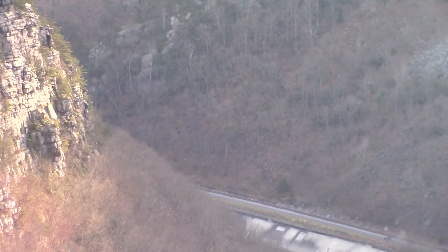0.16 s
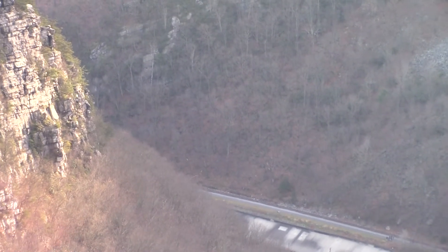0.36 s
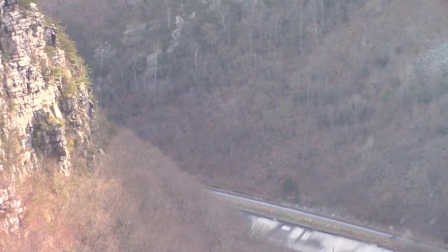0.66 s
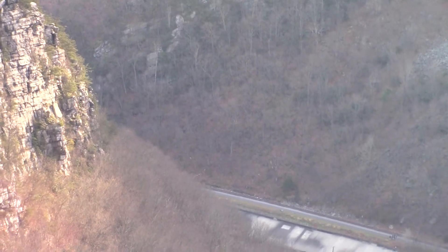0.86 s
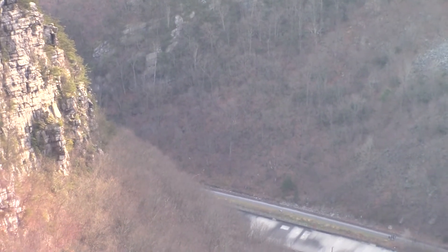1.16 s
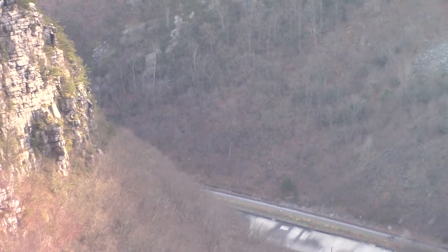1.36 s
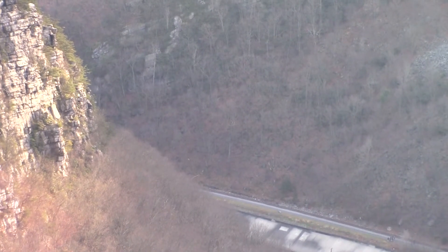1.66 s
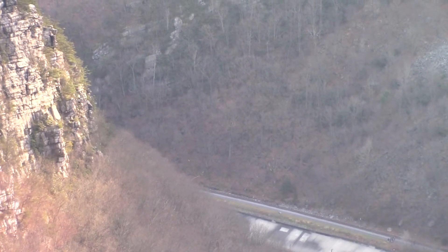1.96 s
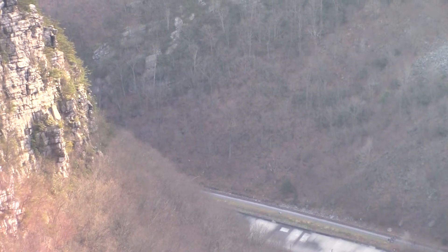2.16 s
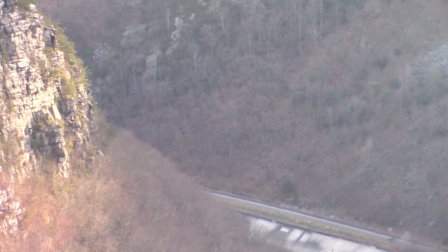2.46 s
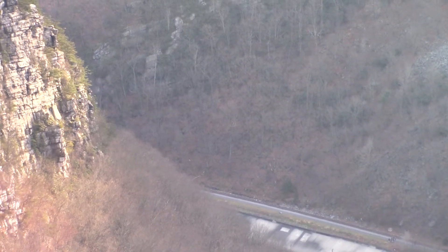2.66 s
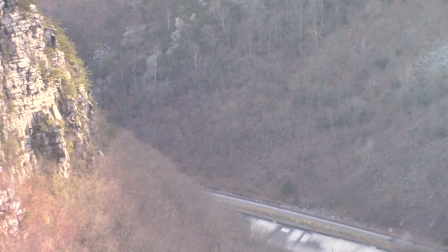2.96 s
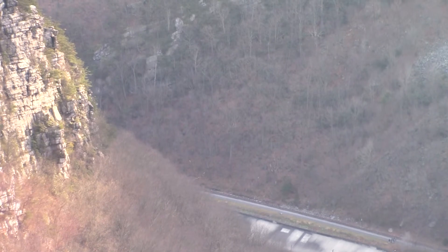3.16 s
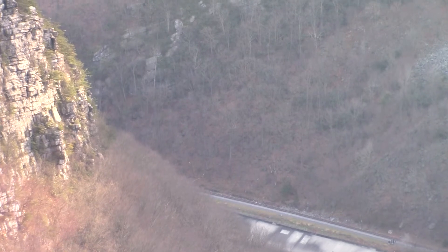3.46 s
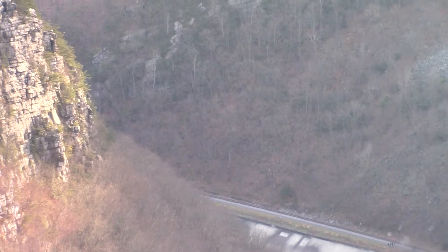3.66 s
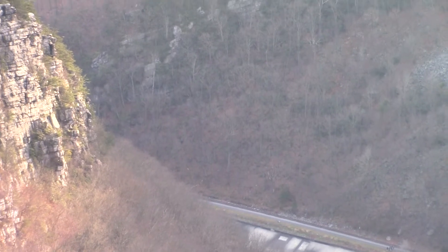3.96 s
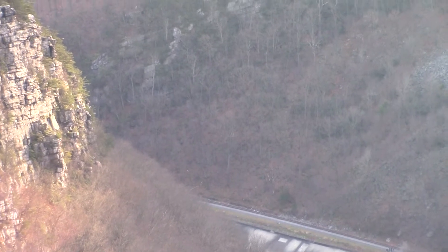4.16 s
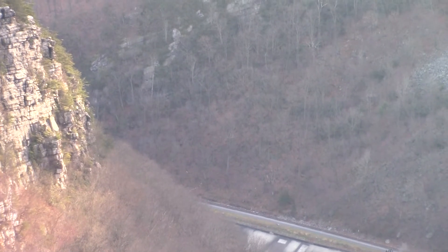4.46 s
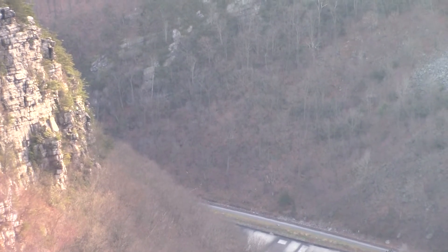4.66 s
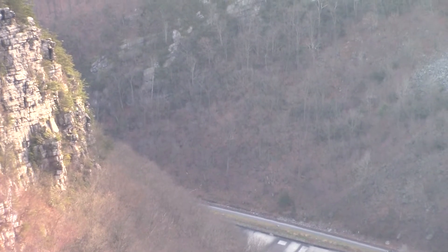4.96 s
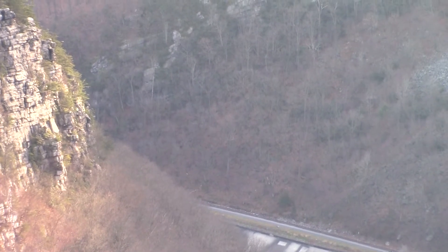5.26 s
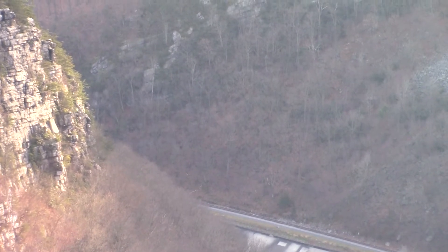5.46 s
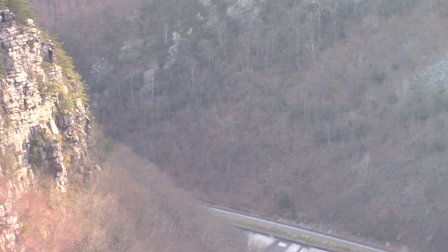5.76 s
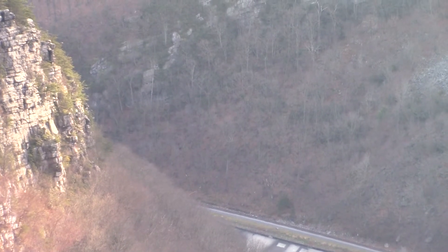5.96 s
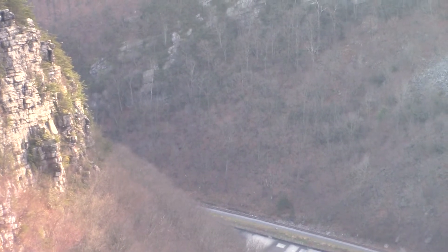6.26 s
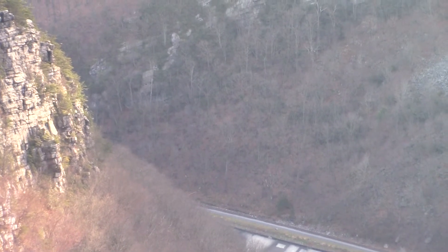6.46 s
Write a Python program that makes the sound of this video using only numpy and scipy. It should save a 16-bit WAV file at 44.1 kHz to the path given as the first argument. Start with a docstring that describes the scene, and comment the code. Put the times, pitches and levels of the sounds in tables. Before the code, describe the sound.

A distant steam locomotive whistles in a wooded valley, over an even, soft rush of river and trees. It opens with a faint breath of steam and a weak first tone. At about 0.6 seconds the whistle opens fully into one long, medium-low note that climbs slightly in pitch and swells until about 2 seconds. Long echoes from the slopes beat against it, making it waver. Low wind thumps hit the microphone between 1.8 and 2.6 seconds, and more weakly from 4 to 4.6. From around 3 seconds the whistle sags and closes, ending near 4 while its echo rings on. At about 4.9 seconds a second, slightly brighter blast begins, rising again with a breathy rush of steam, and holds to the end at around 6.7 seconds. The sound is nearly mono, with very faint hiss and a barely audible thin high whine.

```python
"""A distant steam whistle in a wooded valley: one long blast, eased off, then pulled open again.
A steam jet sounds the locomotive's bell; the note climbs with the pressure, and the slopes return
long echoes that beat against it. Behind it is the even rush of river and trees. Gusts thump a
nearly mono microphone, over faint hiss and a thin electronic whine."""
import sys
import numpy as np
from scipy import signal
from scipy.fft import rfft, irfft, next_fast_len
from scipy.io import wavfile
from scipy.ndimage import uniform_filter1d

SR = 44100
rng = np.random.default_rng(int(sys.argv[2]) if len(sys.argv) > 2 else 0)


def persist_wave(psi):
    """Save psi, clipped to +-1, as 16-bit WAV."""
    counts = np.round(np.clip(psi, -1, 1) * 32767).astype(np.int16)
    wavfile.write(sys.argv[1], SR, np.atleast_2d(counts).T)


N = 291940
TIME = np.arange(N) / SR

# whistle cord pulls: t_open/s, t_ease/s, f_first/Hz, f_full/Hz, blow/dB
CORD_PULLS = [(.16, .5, 296, 302.6, -21), (.59, 2.65, 313.8, 343.6, 0.5), (4.89, 7, 322.8, 343.4, 0.47)]


def locomotive(cliff_db=-9, scatter_db=-7, steam_db=-2.5):
    """Whistle and steam heard across the valley; moving air makes each partial fade and shimmer."""
    # fading of the fundamental: t/s, relative level/dB
    fading = [(0.0, -31), (0.07, -45), (0.28, -34.5), (0.59, -31), (0.66, -21.5), (0.77, -29.5),
              (1.2, -13.5), (1.51, -21.5), (1.97, -16.5), (2.16, -23), (2.36, -13), (2.45, -29),
              (2.54, -15), (2.67, -14), (2.84, -36), (2.93, -17), (3.26, -22.5), (3.32, -17), (3.91, -20),
              (3.95, -26), (4.02, -16), (4.57, -27.5), (5.6, -17.5), (5.66, -24.5), (5.79, -14),
              (6.36, -26), (6.47, -17), (6.62, -17)]
    note, overtones = whistle()
    reflections = slopes()
    cliff = from_db(cliff_db) * echo(note, delay_s=0.88, closing_m_s=3.2)   # bare rock: clean return
    note = note + cliff + from_db(scatter_db) * scatter(note, reflections)
    note_db = np.interp(TIME, *np.transpose(fading)) + 0.52 + 1.15 * drift(11)
    out = impose_level(note, note_db, window=3000)
    for overtone, level_db in overtones:
        shimmer_db = 1.6 * drift(9.4)
        out += impose_level(valley_paths(overtone, reflections), level_db + shimmer_db, window=9000)
    return out + valley_paths(from_db(steam_db) * steam(), reflections)


def whistle(flutter=0.003803, wander=0.001594, edge_db=-9.5):
    """Steam-blown bell: the fundamental, and (wave, level/dB with late echo) for each overtone."""
    # overtones: harmonic, level/dB at 0 dB blow, growth/(dB/dB), second blast/dB, echo/dB, roughness/dB
    harmonics = [(2, -33, 2.1, -3, -6, 2.5), (3, -30.5, 2.5, 1, -1.15, 2.5), (4, -39.5, 2.5, 4, -8, 2.5),
                 (5, -40, 1, 1.5, -11, 5), (6, -45.5, 1.4, 1.5, -14.5, 5.5), (7, -58, -0.3, 2, -13, 4.5),
                 (8, -65.5, -0.3, 3, -10.5, 5.5), (9, -71.5, 0.2, 2, -11.5, 6.5)]
    pitch_hz, blow_db = valve()
    second_blast = ramp(CORD_PULLS[-1][0], 0.037)
    detune = 1 + flutter * drift(28) + wander * drift(3)   # jet turbulence, pressure drift
    phase = 2 * np.pi * np.cumsum(pitch_hz * detune) / SR
    weak_blow = np.minimum(from_db(blow_db - edge_db), 1)   # overtones drop away below edge_db
    overtones = []
    for k, db, growth, change_db, echo_db, rough_db in harmonics:
        strength = from_db(db + growth * blow_db + change_db * second_blast) * weak_blow
        wave = strength * from_db(rough_db * drift(33)) * np.sin(round(k) * phase)
        overtones.append((wave, linger(strength, echo_db)))
    return from_db(blow_db) * np.sin(phase), overtones


def valve(idle_hz=289.4, idle_db=-44.5, sag_db_per_hz=0.11):
    """Pitch/Hz and blow/dB: each pull scoops up, creeps to full pitch, sinks as the valve closes."""
    scoop_s, creep_s, close_s = 0.15, 1.5, 1.3
    attack_s, release_s = 0.037, 0.48
    pitch_hz, blow = np.full(N, idle_hz), np.full(N, from_db(idle_db))
    for open_s, ease_s, first_hz, full_hz, db in CORD_PULLS:
        scoop_hz = (first_hz - idle_hz) * ramp(open_s, scoop_s)
        creep_hz = (full_hz - first_hz) * np.sin(np.pi / 2 * ramp(open_s + scoop_s, creep_s))
        lift_hz = scoop_hz + creep_hz
        closing = 1 - ramp(ease_s, close_s) ** 2.7
        pitch_hz = np.maximum(pitch_hz, idle_hz + lift_hz * closing)
        gate = ramp(open_s, attack_s) * (1 - ramp(ease_s + close_s - release_s, release_s)) ** 2
        sag_db = sag_db_per_hz * (idle_hz + lift_hz - full_hz)   # weak until the note has climbed
        blow = np.maximum(blow, gate * from_db(db + sag_db))
    return pitch_hz, 20 * np.log10(blow)


def steam():
    """Unpitched steam: a broad rush, and noise ringing in the bell's second resonance."""
    # broad rush: f/Hz, relative density/dB
    rush_spectrum = [(300, -34.5), (550, -1.5), (720, 4.5), (900, 3), (1100, 1.5), (1400, -12), (2000, -29),
                     (3000, -44), (5000, -77.5)]
    # hollow bell resonance: f/Hz, relative density/dB
    hollow_spectrum = [(700, -49.5), (840, -27.5), (890, -6), (945, -0.5), (1000, -2.5), (1200, -58.5)]
    # spurts across the lip: t/s, rush/dB, hollow/dB, half length/s
    spurts = [(0, -31.5, -53.5, 0.83), (3.722, -62.5, -33, .18), (4.974, -51, -25.5, .06),
              (5.551, -37.5, -32, 0.71)]
    rush, hollow = from_db(-48), from_db(-44.5)   # steady flow
    for centre_s, rush_db, hollow_db, half_s in spurts:
        shape = swell(centre_s, half_s)
        rush = np.hypot(rush, from_db(rush_db) * shape)
        hollow = np.hypot(hollow, from_db(hollow_db) * shape)
    return rush * unit_rms(noise(rush_spectrum)) + hollow * unit_rms(noise(hollow_spectrum))


def valley_paths(x, reflections, direct_db=-2):
    """Direct path plus scattered sound."""
    return from_db(direct_db) * x + scatter(x, reflections)


def slopes():
    """Dense tree reflections, duller with distance: (delay, closing speed, response) per slope."""
    # wooded slopes: delay/s, t60/s, level/dB, closing speed/(m/s), f_cut/Hz
    hillsides = [(.01, 1.3, 2, 0, 3570), (1.05, 1.7, -2, 3, 1160), (1.4, 6.5, -1.5, 0, 1107)]
    reflections = []
    for delay_s, t60_s, db, closing_m_s, cut_hz in hillsides:
        tail = rng.standard_normal(N) * from_db(-60 * TIME / t60_s)
        tail /= np.sqrt(np.sum(tail ** 2))
        tail = from_db(db) * signal.sosfilt(signal.butter(3, cut_hz, fs=SR, output="sos"), tail)
        reflections.append((delay_s, closing_m_s, rfft(tail, next_fast_len(2 * N))))
    return reflections


def scatter(x, reflections):
    """Sum of the slopes' echoes, each smeared by its trees."""
    size = next_fast_len(2 * N)
    spectrum = sum(rfft(echo(x, delay_s, closing_m_s), size) * response
                   for delay_s, closing_m_s, response in reflections)
    return irfft(spectrum, size)[:N]


def echo(x, delay_s, closing_m_s, sound_m_s=343):
    """Late return from a wall, Doppler-sharp if the train runs towards it."""
    return np.interp((TIME - delay_s) * (1 + closing_m_s / sound_m_s), TIME, x, left=0)


def linger(strength, echo_db, delay_s=0.89, t60_s=3.9):
    """Level/dB of a tone plus the late echo that builds and dies behind it."""
    pole = from_db(-60 / (t60_s * SR)) ** 2
    late_power = signal.lfilter([1 - pole], [1, -pole], echo(strength, delay_s, 0) ** 2)
    return 10 * np.log10(strength ** 2 + from_db(echo_db) ** 2 * late_power)


def wind(gain_db=-3, wake_db=-17):
    """Each eddy thumps the microphone and trails a rumble."""
    # wind on the microphone: f/Hz, relative density/dB
    rumble_spectrum = [(8, -7.5), (18, 13), (38, 0.5), (60, -8.5), (90, -19), (140, -35.5), (300, -59),
                       (2000, -130)]
    # eddies: t/s, relative peak/dB
    eddies = [(1.799, -21), (2.039, -7.5), (2.185, -2), (2.36, -9), (2.494, -16.5), (2.599, -18.5),
              (4.069, -21.5), (4.201, -17.5), (4.545, -25)]
    power = np.zeros(N)
    for hit_s, db in eddies:
        thump = swell(hit_s + 0.017, half_s=0.031) ** 2
        wake = from_db(wake_db) ** 2 * swell(hit_s + 0.08, half_s=0.27)
        power += from_db(db) ** 2 * (thump + wake)
    return impose_level(noise(rumble_spectrum), 10 * np.log10(power + 1e-12) + gain_db, window=1800)


def river_and_trees():
    """Even rush of water and foliage."""
    # valley background: f/Hz, density/(dB re 1/Hz)
    valley_spectrum = [(20, -60), (60, -56.5), (140, -61.5), (185, -58), (225, -59.5), (450, -64),
                       (800, -63.5), (1150, -68), (1500, -72), (2000, -80.5), (2500, -87.5), (3200, -100),
                       (5000, -120)]
    return noise(valley_spectrum)


def noise(spectrum):
    """Noise of a given power density, interpolated over log frequency."""
    hz, db = np.transpose(spectrum)
    bins_hz = np.maximum(np.fft.rfftfreq(N, 1 / SR), 1)
    gain = from_db(np.interp(np.log(bins_hz), np.log(hz), db))
    return irfft(rfft(rng.standard_normal(N)) * gain, N) * np.sqrt(SR / 2)


def drift(rate_hz):
    """Slow random motion, unit RMS."""
    bins_hz = np.fft.rfftfreq(N, 1 / SR)
    return unit_rms(irfft(rfft(rng.standard_normal(N)) / (1 + (bins_hz / rate_hz) ** 2), N))


def impose_level(x, level_db, window):
    """Flatten the envelope over `window` samples, then apply the smoothed level curve."""
    x = unit_rms(x)
    power = uniform_filter1d(uniform_filter1d(x ** 2, window), window)
    return x / np.sqrt(np.abs(power) + 1e-7) * uniform_filter1d(from_db(level_db), window // 2)


def ramp(start_s, length_s):
    """Linear rise, 0 to 1."""
    return np.clip((TIME - start_s) / length_s, 0, 1)


def swell(centre_s, half_s):
    """Rounded pulse, height 1."""
    return 1 / np.cosh(np.clip(2 * (TIME - centre_s) / half_s, -60, 60))


def from_db(db):
    """Decibels to gain."""
    return 10 ** (np.asarray(db) / 20)


def unit_rms(x):
    """Scale to unit power."""
    return x / np.sqrt(np.mean(x ** 2) + 1e-20)


def scene():
    """All sources, alike in both channels."""
    return np.tile(locomotive() + river_and_trees() + wind(), (2, 1))


def record(dry, whine_hz=7882, whine_db=-74, waver_db=1.0, cutoff_hz=15750):
    """The recorder adds near-mono hiss and a wavering whine, then cuts the top."""
    # microphone hiss: f/Hz, density/(dB re 1/Hz)
    hiss_spectrum = [(1500, -104), (2800, -99), (4000, -97.5), (8000, -99.5), (12000, -100.2),
                     (16000, -103.7)]
    hiss = noise(hiss_spectrum) + from_db(-9.5) * noise(hiss_spectrum) * np.array([[1], [-1]])
    whine = np.sqrt(2) * from_db(whine_db + waver_db * drift(25)) * np.sin(2 * np.pi * whine_hz * TIME)
    low_pass = signal.ellip(12, 0.1, 90, cutoff_hz, fs=SR, output="sos")
    return signal.sosfilt(low_pass, dry + hiss + whine)


dry = scene()
out = record(dry)
persist_wave(out)
```